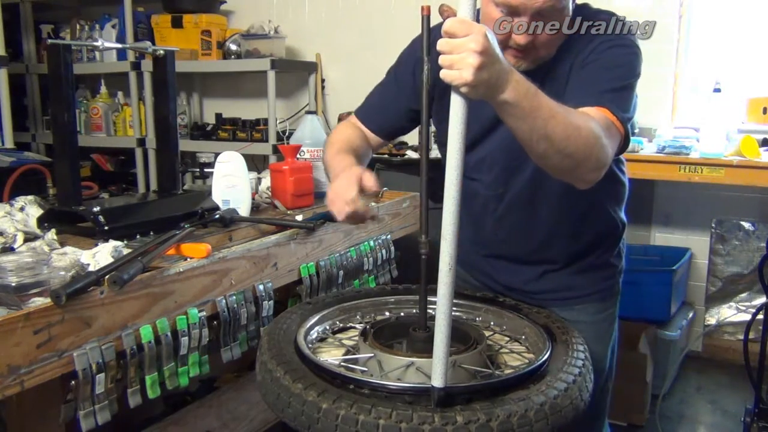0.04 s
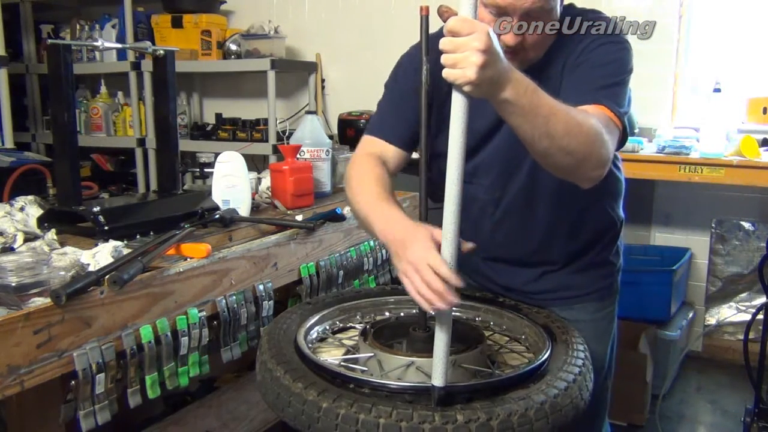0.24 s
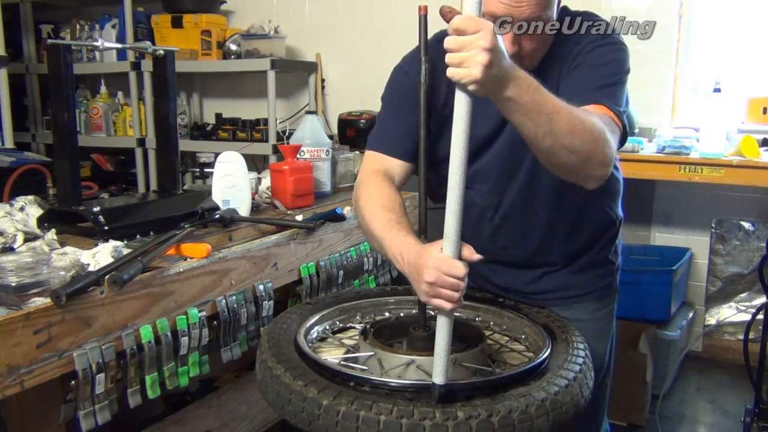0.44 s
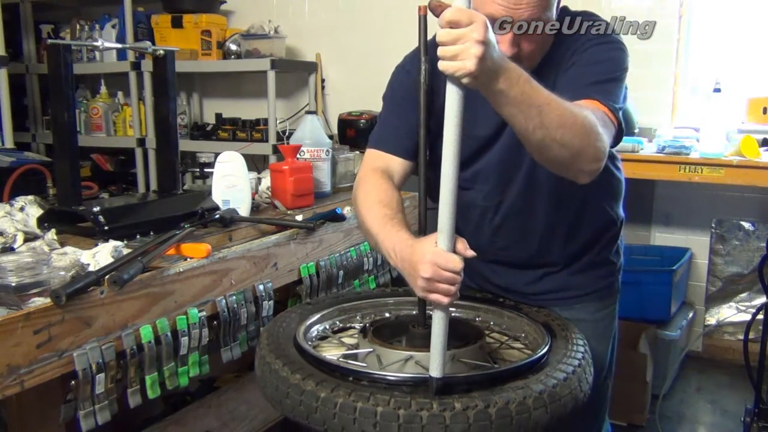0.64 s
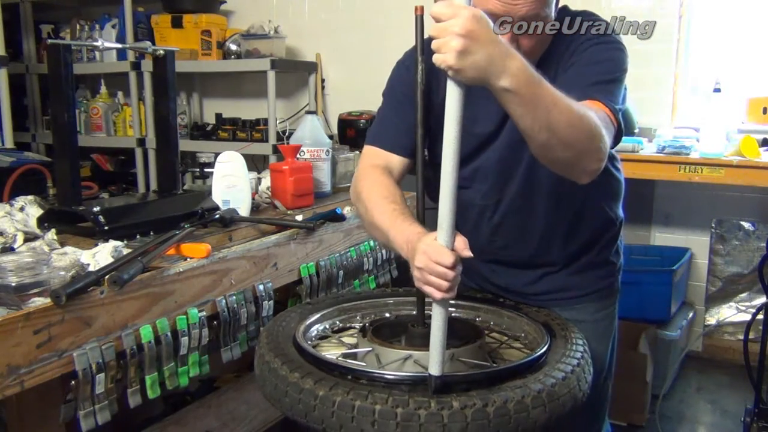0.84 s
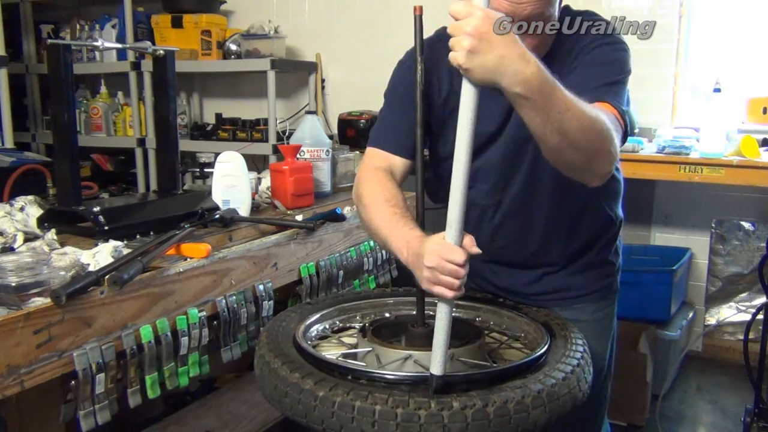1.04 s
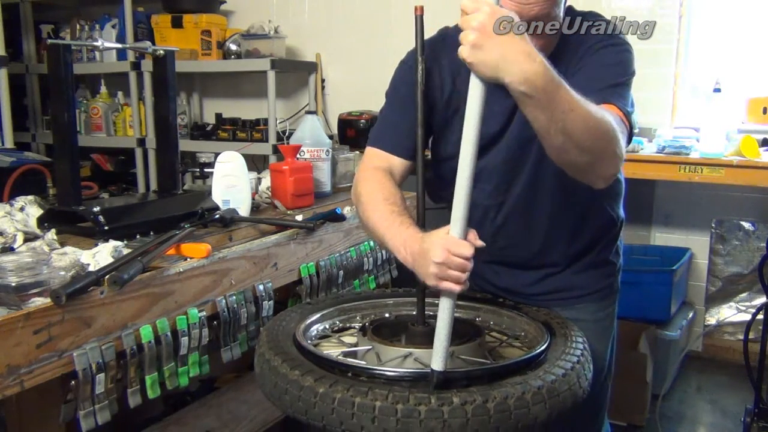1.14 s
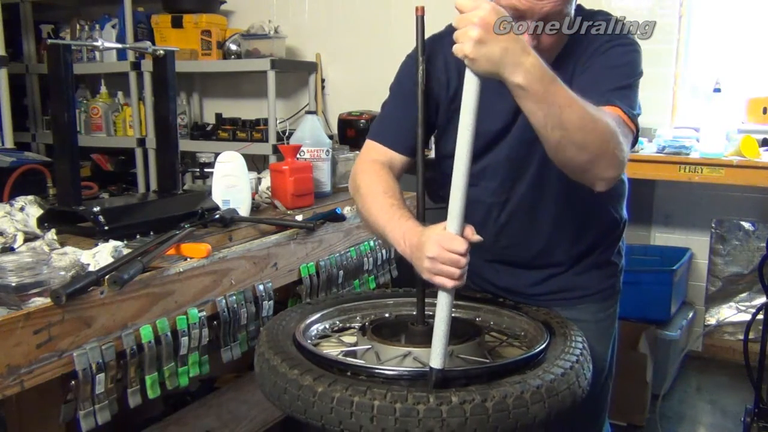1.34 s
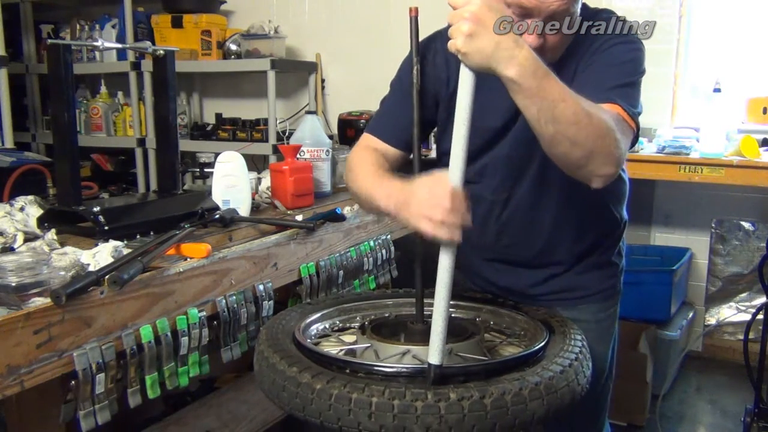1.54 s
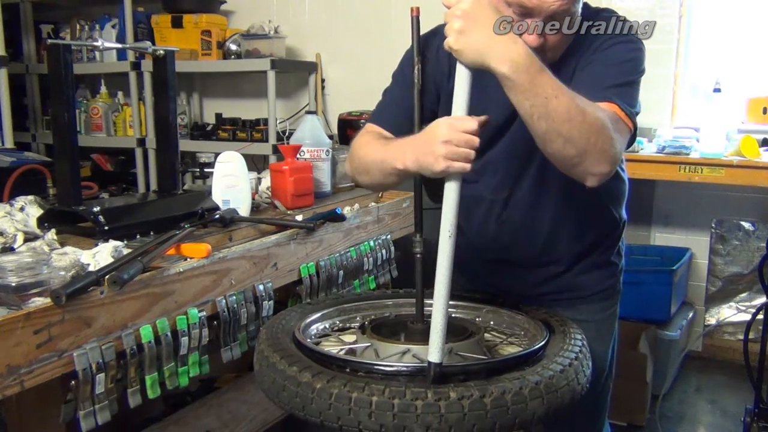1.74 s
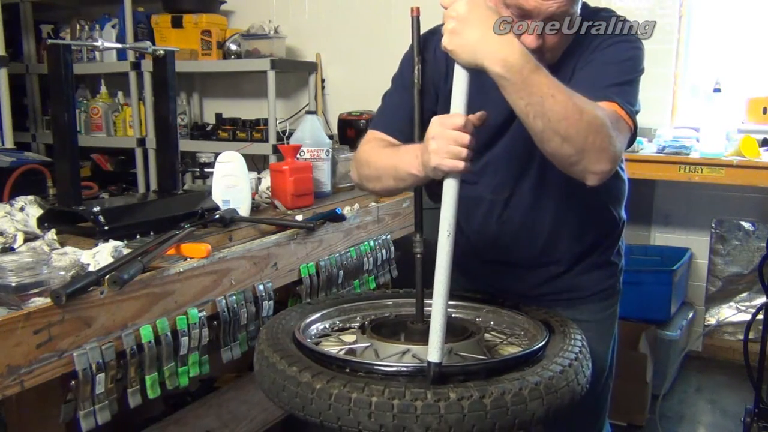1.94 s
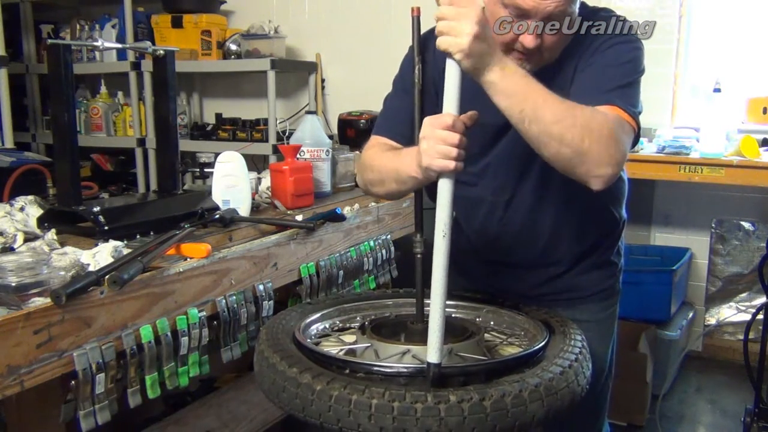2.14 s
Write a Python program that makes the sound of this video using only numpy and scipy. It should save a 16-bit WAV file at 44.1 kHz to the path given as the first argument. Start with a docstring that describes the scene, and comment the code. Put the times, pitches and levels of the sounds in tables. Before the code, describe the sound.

A metal bar scrapes along a steel post with a high ring, then clanks loudly.

```python
"""A small workshop: a long metal tyre bar is worked against the steel post of a wheel stand.
Just knocked, it scrapes along the post, and friction makes it sing in its high modes. A hand closes on
it and damps the lower ones; the ring dies away once the bar leaves the post. After a soft knock and
some quiet handling it slips and clanks against the stand and the wheel rim."""
import sys
import numpy as np
from scipy import signal
from scipy.fft import rfft, irfft, next_fast_len
from scipy.io import wavfile
from scipy.ndimage import map_coordinates

SR = 44100
rng = np.random.default_rng(int(sys.argv[2]) if len(sys.argv) > 2 else 0)


def store_pcm(level_fs):
    """Save levels as 16-bit WAV."""
    pcm = np.round(np.clip(level_fs, -1, 1) * 32767).astype(np.int16)
    wavfile.write(sys.argv[1], SR, np.atleast_2d(pcm).T)


N = 96711

# Stereo image of every noise layer: frequency_hz, left_right_correlation
NOISE_WIDTH = [(30, 0.5), (150, 0.75), (3000, 1), (5500, 0.92), (9000, .92), (15000, .93)]

# The bar's modes: pitch_hz, level_db, scraped_swell_db_per_s, grip_loss_db, free_t60_s, rough_share
BAR_MODES = [(480, -58, -16, 0, .3, .4), (1110, -39.5, -52, 8, .5, .3), (2263, -35.5, -26, 3, .85, .25),
             (2818, -28.5, -8, 12, .48, .3), (4423, -45, 0, 0, .55, .6), (5426, -21, -12, 5, .48, .42),
             (5907, -19.3, -9, 0, .53, .27), (9035, -21, 1, 0, .4, .45), (10028, -47, 11, 0, .43, .7),
             (10573, -43, 11, 0, .48, .55), (12906, -43, 4, 0, .34, .65), (14970, -55, 0, 0, .38, .7),
             (15243, -58, 8, 0, .34, .7)]
# Where the modes sit in the image: pitch_hz, left_minus_right_db
BAR_PAN = [(1100, -2.7), (4400, -3), (5400, -5), (5900, -3.1), (9000, -.3), (15000, .5)]
# Diffuse part of the ring, opposite in the two ears: pitch_hz, relative_db
BAR_DIFFUSE = [(2500, -22), (5600, -11), (9000, -14), (13000, -15)]
GRIP_S, GRIP_FADE_S, RELEASE_S = .253, .01, .54  # the hand closes; the bar leaves the post
LINE_WIDTH_HZ, SKIRT_HZ = 16, 110  # spread of the roughness around each mode
WANDER_HZ, FLICKER_DB, FLICKERS_PER_S = 3, 2, 28

# The bar sliding on the post: time_s, level_db
SCRAPE_LEVEL = [(0, -40.5), (.05, -43.5), (.11, -42.5), (.14, -41), (.2, -44.5), (.255, -46.5), (.31, -35),
                (.385, -38), (.43, -34), (.53, -40.5), (.62, -46.5), (.75, -64), (.95, -104)]
# Bright hiss of that friction: frequency_hz, density_db
SCRAPE_COLOUR = [(200, -72), (480, -23.5), (1500, -21), (3500, -15.5), (4800, -8), (6200, -2), (7000, 0),
                 (8500, 4.5), (10300, -5.5), (11500, -19.5), (13000, -26.5), (15500, -37)]
# The bar catching and chattering: start_s, level_db, centre_hz
CATCHES = [(.002, -28.5, 3600), (.023, -29, 8000), (.079, -29, 6600), (.264, -28.5, 7800),
           (0.278, -29.5, 8000), (.397, -29, 8190), (0.502, -29.5, 7410)]
# A palm sliding on the bar: time_s, level_db
PALM_LEVEL = [(.9, -80), (1.15, -77), (1.4, -79.5), (1.85, -74.5), (1.98, -69.5), (2.02, -69),
              (2.13, -69.5)]
GRIT_DB, GRITS_PER_S, SCRAPE_PAN_DB = 1.5, 400, -.5
CATCH_T60_S, CATCH_OCTAVES = .13, .4

# Hits of the bar on the stand: start_s, ring_db, thud_db, clatter_db, crack_db, brightness_hz
BLOWS = [(.002, -60.5, -68, -27, -46, 4000), (2.1395, -23.5, -11.5, -18.5, -17, 940),
         (2.1574, -35.5, -36, -22.5, -51.5, 2950), (2.1631, -28.5, -11, -21, -17, 3014),
         (2.1716, -22.5, -12.5, -22.5, -22.5, 2981), (2.1771, -21.5, -7.5, -20, -48.5, 2000)]
# Modes of the stand and rim: pitch_hz, relative_db, t60_s
STAND_MODES = [(156.4, -9, 0.45), (240, -2.5, .12), (371.8, -0.5, 0.16), (476, -10, 0.1587),
               (580, 1.5, 0.29), (847, -13.5, .14), (957.5, 1, 0.18), (1170, -11.5, .2),
               (1468, -17.5, 0.19), (1737, -10, .25), (1894, -1, 0.31), (2246, -16, 0.11),
               (2625, -11.5, 0.11)]
# Rattle of the spoked wheel: frequency_hz, density_db
CLATTER_COLOUR = [(50, -19.5), (100, -19.5), (170, -16), (400, -10.5), (900, -1), (2100, 2), (3000, -4),
                  (4200, -12), (8000, -25.5), (11000, -40), (15000, -54.5)]
# Snap of metal meeting metal: frequency_hz, density_db
CRACK_COLOUR = [(800, -18.5), (3000, -13), (6000, -5.5), (8200, 2.5), (10000, -10), (13000, -34),
                (15500, -38)]
# The workshop's midrange reverb: frequency_hz, density_db
ROOM_COLOUR = [(150, -47.5), (500, -9), (900, 0.5), (1500, -1), (2700, -14), (4000, -25.5), (7000, -40)]
THUD_HZ, THUD_PEAK_S, CLATTER_T60_S, STAND_PAN_DB = 509.6, .00068, .19, .76
CRACK_T60_S, CRACK_TAIL_DB, CRACK_TAIL_T60_S = .011, -15.5, .32
CLATTER_ROOM_DB, ROOM_T60_S = -12.5, .54

# Bed of room tone and sleeves: time_s, level_db
RUSTLE_LEVEL = [(.45, -70), (.62, -64), (.9, -66.5), (1.19, -66.5), (1.306, -64.5), (1.36, -65),
                (1.556, -64.5), (1.72, -65), (1.886, -65.5), (2.13, -58.5)]
# Soft, broad tone of that bed: frequency_hz, density_db
RUSTLE_COLOUR = [(15, -44.5), (25, -10), (53, -10.5), (169, -6), (445, -6), (722, -7.5), (826, -4),
                 (1900, -11.5), (2770, -13.5), (7700, -16.5), (10400, -22), (15500, -24.5)]

# Close contacts heard as one soft knock: start_s, level_db
KNOCKS = [(.773, -56.5), (0.783, -57), (0.79, -53)]
KNOCK_T60_S, KNOCK_ROOM_DB = .043, -1

# The bar ticking in its seat: start_s, level_db
TICKS = [(.965, -71.5), (1.377, -54), (2.01, -43.5), (2.077, -50), (2.097, -51), (2.129, -45)]

# The grip shifting on the bar: time_s, level_db
RUB_LEVEL = [(1.15, -88.5), (1.29, -67), (1.42, -69.5), (1.57, -64), (1.7, -73), (1.9, -77), (2.05, -68)]
# Dull tone of that rub: frequency_hz, density_db
RUB_COLOUR = [(25, -13.5), (55, 0), (300, -3.5), (600, -11), (1300, -17), (1950, -8.5), (2500, -27),
              (8000, -45)]

# Soft bumps against the tyre: start_s, level_db, pitch_hz
BUMPS = [(2.056, -49, 130), (2.128, -51, 574), (2.152, -35, 70), (2.174, -31, 71)]
BUMP_PEAK_S = .0025

LIMIT_DB, LIMIT_WINDOW_S, TOP_HZ = -13, .015, 15700


def amp(db):
    """Decibels to gain."""
    return 10 ** (np.asarray(db) / 20)


def unit_rms(x):
    """Scale to rms 1."""
    return x / np.sqrt(np.mean(np.abs(x) ** 2) + 1e-20)


def pan(db):
    """Channel gains that put the left db above the right."""
    return amp(np.array([[db], [-db]]) / 2)


def along(points, hz):
    """Read (frequency_hz, value) points on a log frequency axis."""
    frequencies, values = np.transpose(points)
    return np.interp(np.log(hz + 1), np.log(frequencies + 1), values)


def fader(rows):
    """Gain for every sample from (time_s, level_db) rows, holding the end levels."""
    return amp(np.interp(np.arange(N) / SR, *np.transpose(rows)))


def since(start_s):
    """Seconds since start_s, zero before it."""
    return np.maximum(np.arange(N) / SR - start_s, 0)


def decay(start_s, t60_s):
    """Percussive envelope: a sharp attack and an exponential tail."""
    t = since(start_s)
    return (1 - np.exp(-t / .0003)) * amp(-60 * t / t60_s)


def wobble(knots_per_s):
    """Smooth random modulation."""
    return map_coordinates(rng.standard_normal(8192), [np.arange(N) * knots_per_s / SR], mode="wrap")


def filtered(x, response):
    """Equalise x with a gain that is a function of frequency."""
    size = next_fast_len(N + SR // 4)
    return irfft(rfft(x, size) * response(np.fft.rfftfreq(size, 1 / SR)), size)[..., :N]


def noise(colour):
    """Coloured stereo noise of rms 1, widest in the bass."""
    def mid_side_gains(hz):
        angle = np.arccos(np.clip(along(NOISE_WIDTH, hz), -1, 1)) / 2
        return amp(along(colour, hz)) * [np.cos(angle), np.sin(angle)]

    mid, side = filtered(rng.standard_normal((2, N)), mid_side_gains)
    return unit_rms(np.array([mid + side, mid - side]))


def singing_bar():
    """Friction keeps the modes ringing unevenly; the hand damps lower ones; all fade once it is free."""
    free_s = since(RELEASE_S)
    scraped_s = since(0) - free_s
    grip = np.clip(since(GRIP_S) / GRIP_FADE_S, 0, 1)
    line_shape = np.poly(np.exp(-2 * np.pi * np.array([LINE_WIDTH_HZ, SKIRT_HZ]) / SR))
    out = np.zeros((2, N))
    for hz, db, swell, grip_loss_db, t60_s, rough in BAR_MODES:
        friction = rng.standard_normal((2, N)) + 1j * rng.standard_normal((2, N))
        driven, diffuse = unit_rms(signal.lfilter([1], line_shape, friction))
        side = amp(along(BAR_DIFFUSE, hz)) * np.array([diffuse, -diffuse])
        swing = np.sqrt(1 - rough) + np.sqrt(rough) * driven + side
        phase = 2 * np.pi * np.cumsum(hz + WANDER_HZ * wobble(FLICKERS_PER_S)) / SR
        tone = np.sqrt(2) * np.real(swing * np.exp(1j * phase))
        level_db = db + swell * scraped_s - grip_loss_db * grip - 60 * free_s / t60_s
        flicker_db = FLICKER_DB * wobble(FLICKERS_PER_S)
        out += pan(along(BAR_PAN, hz)) * amp(level_db + flicker_db) * tone
    return out


def scrape():
    """Gritty hiss of metal on metal, flaring where the bar catches; later a palm slides on the bar."""
    grit = unit_rms(amp(GRIT_DB * wobble(GRITS_PER_S)))
    hiss = (fader(SCRAPE_LEVEL) + fader(PALM_LEVEL)) * noise(SCRAPE_COLOUR)
    for start_s, db, centre_hz in CATCHES:
        band = lambda hz: 1 / (1 + (np.log2((hz + 1) / centre_hz) / CATCH_OCTAVES) ** 2)
        flare = unit_rms(filtered(noise(SCRAPE_COLOUR), band))
        hiss += amp(db) * decay(start_s, CATCH_T60_S) * flare
    return pan(SCRAPE_PAN_DB) * grit * hiss


def thud(start_s, hz, peak_s):
    """The body of a hit: a dull, quickly damped swing whose envelope crests after peak_s."""
    t = since(start_s)
    return -np.sin(2 * np.pi * hz * t) * t / peak_s * np.exp(1 - t / peak_s)


def crack(start_s):
    """The bright snap of a contact and its short wash in the room."""
    wash = amp(CRACK_TAIL_DB) * decay(start_s, CRACK_TAIL_T60_S)
    return noise(CRACK_COLOUR) * (decay(start_s, CRACK_T60_S) + wash)


def clanks():
    """Each blow thuds, cracks, rings the stand and rattles the spoked wheel at its own brightness."""
    out = np.zeros((2, N))
    for start_s, ring_db, thud_db, clatter_db, crack_db, brightness_hz in BLOWS:
        t = since(start_s)
        lowpass = lambda hz: 1 / np.sqrt(1 + (hz / brightness_hz) ** 4)
        ring = np.zeros(N)
        for hz, db, t60_s in STAND_MODES:
            tone = np.sin(2 * np.pi * (hz * t + rng.random()))
            ring += amp(db) * lowpass(hz) * decay(start_s, t60_s) * tone
        clatter = decay(start_s, CLATTER_T60_S) * filtered(noise(CLATTER_COLOUR), lowpass)
        room = amp(CLATTER_ROOM_DB) * decay(start_s, ROOM_T60_S) * noise(ROOM_COLOUR)
        attack = amp(thud_db) * thud(start_s, THUD_HZ, THUD_PEAK_S) + amp(crack_db) * crack(start_s)
        out += attack + amp(ring_db) * ring + amp(clatter_db) * (clatter + room)
    return pan(STAND_PAN_DB) * out


def rustle():
    """Sleeves and room tone: a quiet bed that comes through as the scrape fades."""
    return fader(RUSTLE_LEVEL) * noise(RUSTLE_COLOUR)


def soft_knock():
    """A dull knock, heard mostly as the room's long reply."""
    out = np.zeros((2, N))
    for start_s, db in KNOCKS:
        tail = amp(KNOCK_ROOM_DB) * decay(start_s, ROOM_T60_S)
        out += amp(db) * noise(ROOM_COLOUR) * (decay(start_s, KNOCK_T60_S) + tail)
    return out


def seat_ticks():
    """Light, bright contacts of the bar in its seat."""
    return sum(amp(db) * crack(start_s) for start_s, db in TICKS)


def grip_rub():
    """The hand shifts its grip with a dull rub."""
    return fader(RUB_LEVEL) * noise(RUB_COLOUR)


def tyre_bumps():
    """Soft thuds against the tyre around the final clank."""
    return sum(amp(db) * thud(start_s, hz, BUMP_PEAK_S) for start_s, db, hz in BUMPS)


def scene():
    """The metal up front, with the quiet handling underneath."""
    metal = singing_bar() + scrape() + clanks()
    return metal + rustle() + soft_knock() + seat_ticks() + grip_rub() + tyre_bumps()


def record(dry):
    """A soft limiter holds loud passages down, and everything above TOP_HZ is cut."""
    pole = np.exp(-1 / (LIMIT_WINDOW_S * SR))
    power = signal.lfilter([1 - pole], [1, -pole], np.mean(dry ** 2, axis=0))
    gain = (1 + (power / amp(LIMIT_DB) ** 2) ** 2) ** -.25
    return filtered(dry * gain, lambda hz: hz < TOP_HZ)


dry = scene()
out = record(dry)
store_pcm(out)
```